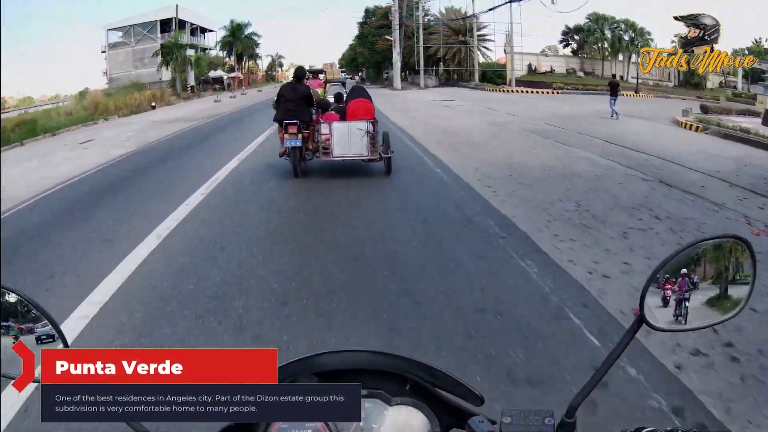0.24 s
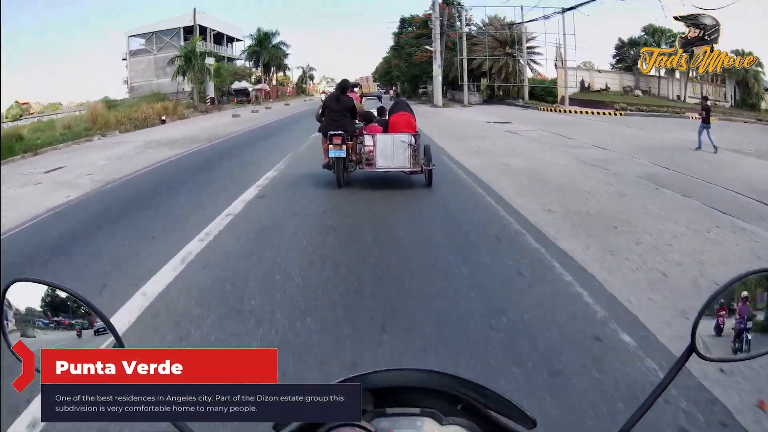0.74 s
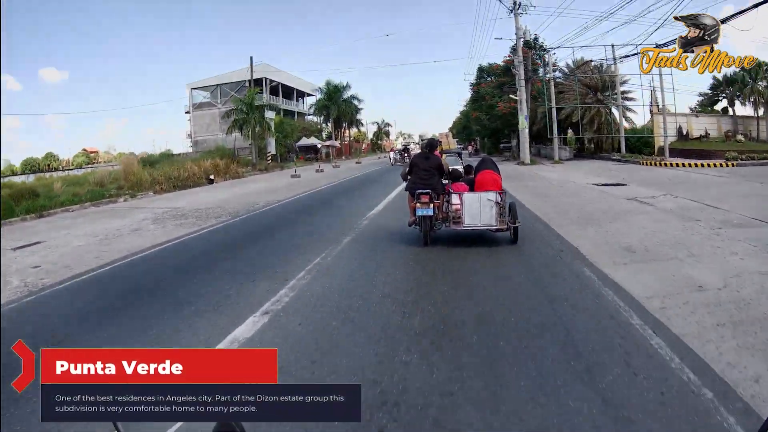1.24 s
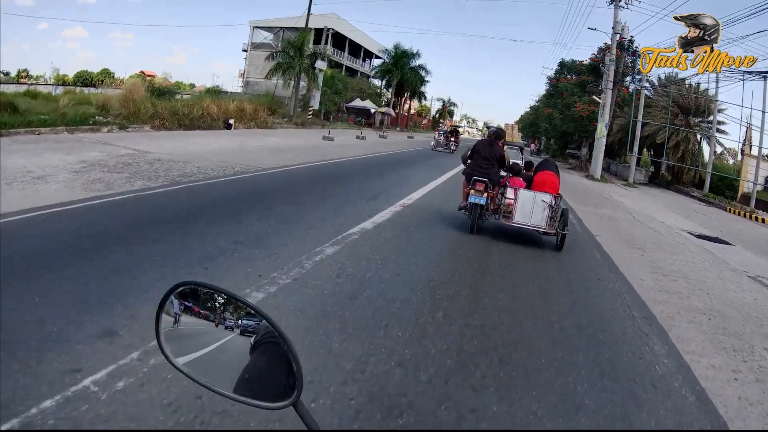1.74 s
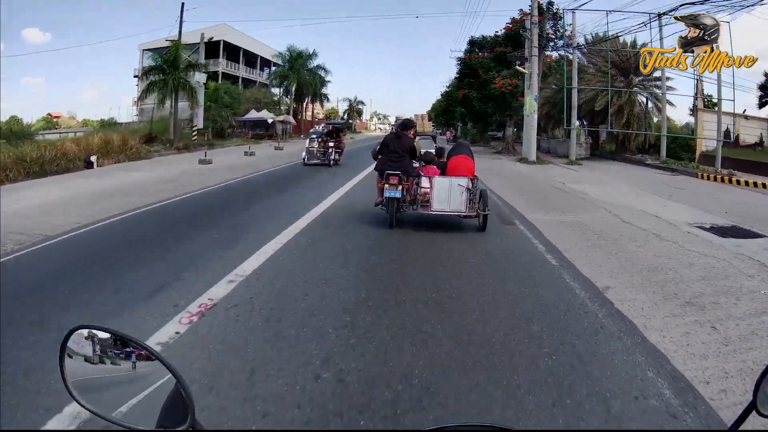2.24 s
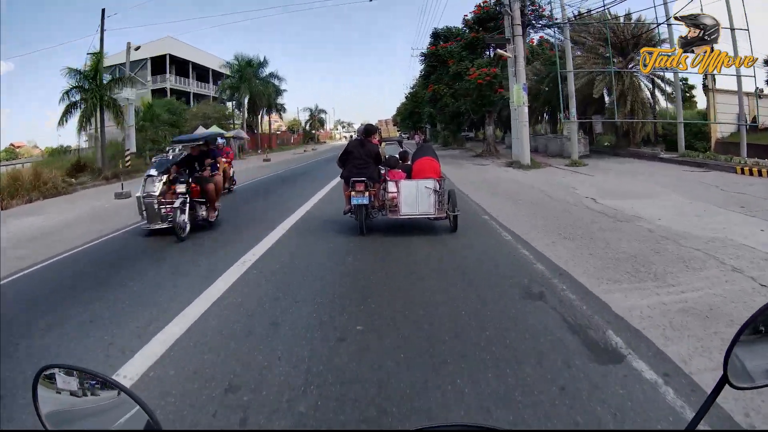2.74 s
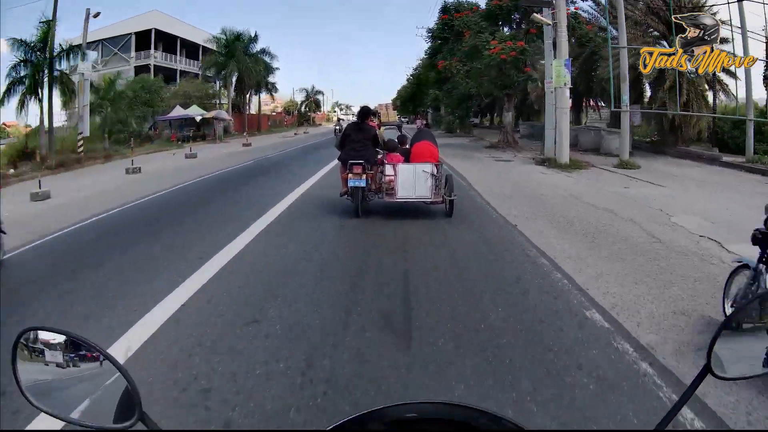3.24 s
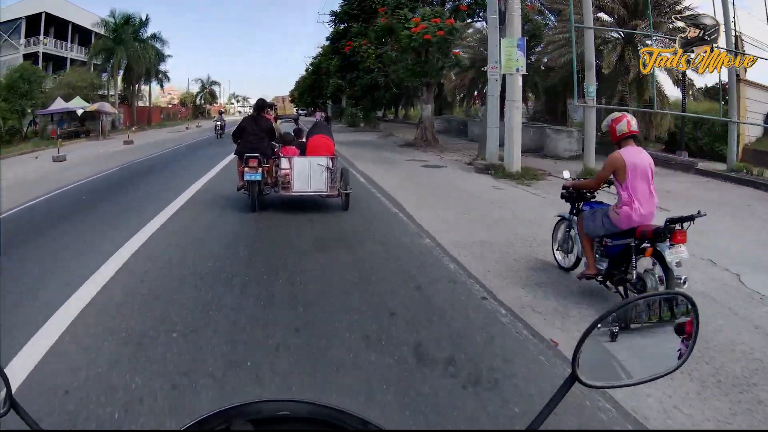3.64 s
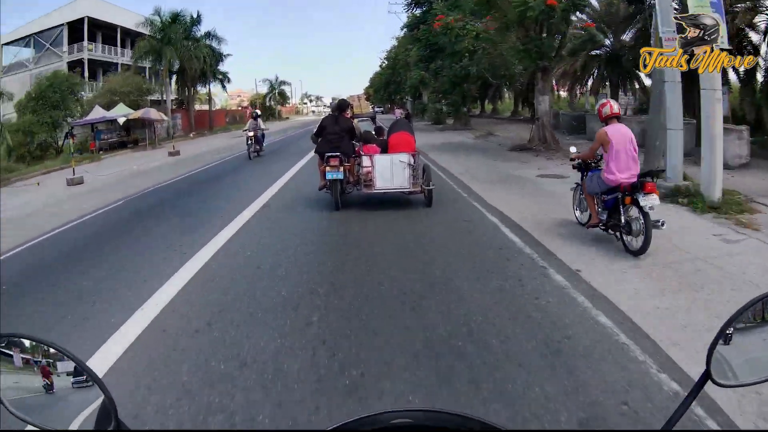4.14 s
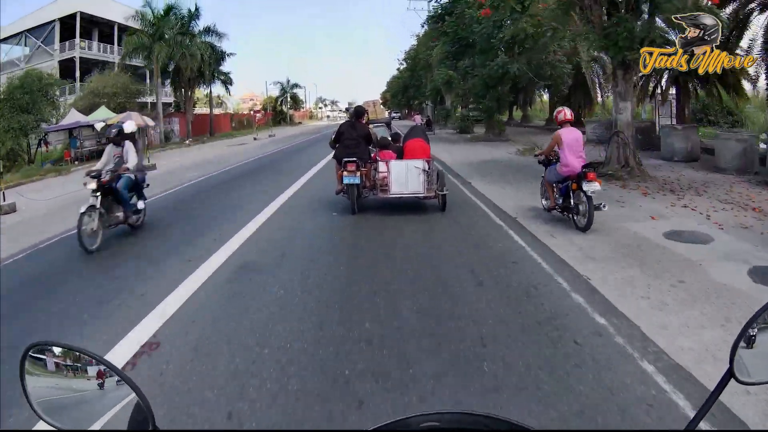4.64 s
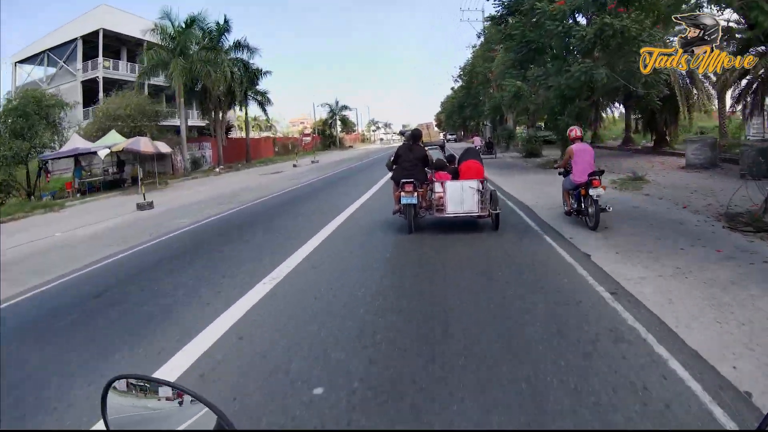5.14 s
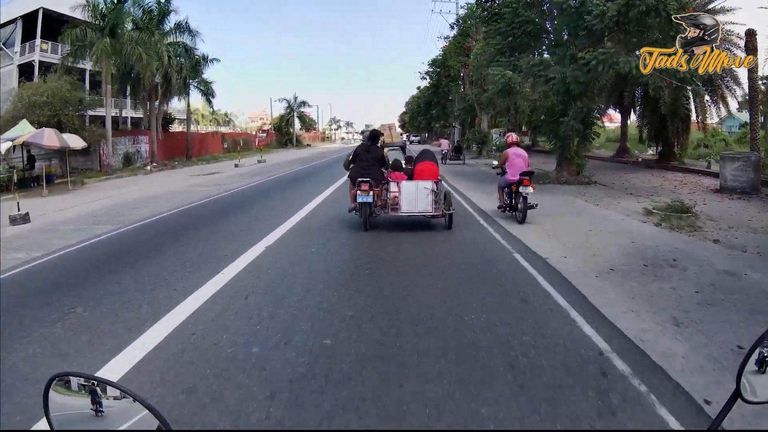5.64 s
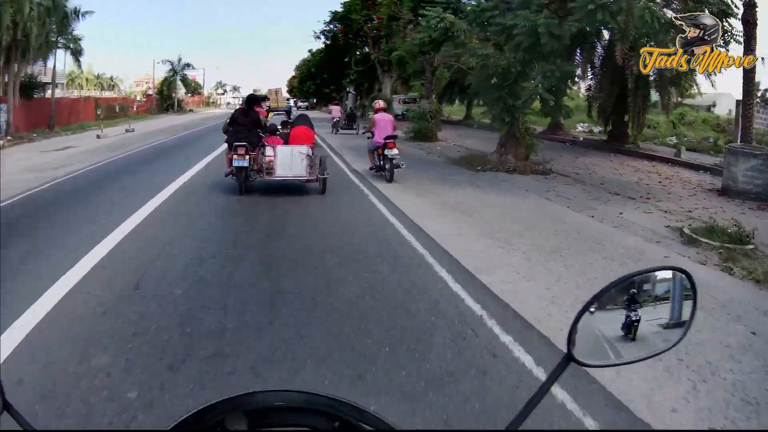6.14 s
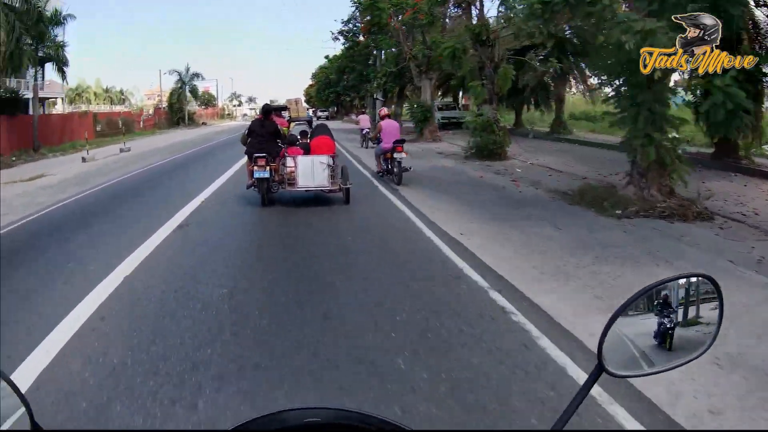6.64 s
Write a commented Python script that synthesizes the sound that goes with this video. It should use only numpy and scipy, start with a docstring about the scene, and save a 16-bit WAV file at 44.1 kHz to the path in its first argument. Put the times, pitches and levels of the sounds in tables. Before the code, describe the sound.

A continuous motorcycle ride, close and muffled at the rider's helmet. Deep, uneven wind rumble flutters throughout, with quick gusts near 0.1, 0.4, 0.8 and 1.1 seconds and a longer push around 1.8. Beneath it, a single-cylinder engine hums steadily at about 35 firings a second, with casing clatter, fine valve taps, tyre roar and thin air hiss. A sidecar motorcycle ahead drones low, swelling until 2.9 then dropping away. Near 2.8-3.0 a wavering gear whine slides down slightly as traffic brushes past; heavy exhaust thrum peaks around 3.3-3.5. A deeper, slower overtaking bike stays strong until about 4.3, then fades. Loud moments briefly squash the level. Wind thumps again at 5.2-5.4; a broad, soft passing swell comes near 6.5. Tiny metallic rattles tick irregularly, clustering around 4 seconds. The ride continues to the end at about 6.9.

```python
"""Wind buffets a muffled microphone at a motorcycle rider's helmet: noise in bands, swollen by gusts.
Below it lie tyre roar and air hiss, also noise, and the rider's single-cylinder engine: sines on its firing rate,
gated clatter and valve taps. Pulses ringing in pipes make a sidecar rig ahead, an overtaking bike and an oncoming
rig, whose gear whine is a gliding tone. Loose parts tick as decaying rings, passing traffic adds swells and sizzle,
and loud stretches pull the recorder's gain down."""
import sys
import numpy as np
from scipy import signal
from scipy.io import wavfile

SR = 44100
rng = np.random.default_rng(int(sys.argv[2]) if len(sys.argv) > 2 else 0)


def generate_wav(sig):
    """Save sig (samples, or channels by samples) to the path in sys.argv[1] as 16-bit PCM at SR."""
    pcm = np.round(np.clip(np.atleast_2d(sig).T, -1, 1) * 32767).astype(np.int16)
    wavfile.write(sys.argv[1], SR, pcm)


N = 304731


def from_db(db):
    """Decibel law: 20 dB is a factor of ten in amplitude."""
    return 10 ** (np.asarray(db) / 20)


def rms_one(x):
    """Normalisation of the effective value to 1."""
    return x / np.sqrt(np.mean(x ** 2) + 1e-20)


def in_time(rows):
    """Linear interpolation of each column over time; the end values are held outside the rows."""
    s, *columns = np.transpose(rows)
    return [np.interp(np.arange(N) / SR, s, column) for column in columns]


def drift(rate):
    """Low-passed chance: a random curve of spread 1 that wanders about `rate` times a second."""
    r = np.exp(-80 * np.pi * rate / SR)   # one value every 40 samples
    white = rng.standard_normal(N // 40 + 2002)
    slow = signal.lfilter([1], [1, -2 * r, r * r], white)[2000:]   # the filter has settled
    return np.interp(np.arange(N) / 40, np.arange(len(slow)), rms_one(slow))


def resonance(x, hz, width_hz):
    """Damped resonator: a two-pole band-pass with gain 1 at its top."""
    r = np.exp(-np.pi * width_hz / SR)
    zeros = np.array([1, 0, -1]) * (1 - r * r) / 2
    poles = [1, -2 * r * np.cos(2 * np.pi * hz / SR), r * r]
    return signal.lfilter(zeros, poles, x)


def double_resonance(x, hz, width_hz):
    """Cascaded resonators: the second, twice as wide, steepens the skirts of the first."""
    return resonance(resonance(x, hz, width_hz), hz, 2 * width_hz)


def banded_noise(spectrum, together_db, own_db, flicker_rate, tilt_db=lambda hz: 0):
    """Subtractive synthesis: third-octave bands of noise flicker partly together, partly each alone."""
    hz, level_db = np.transpose(spectrum)
    edges = np.geomspace(hz[0], hz[-1], round(3 * np.log2(hz[-1] / hz[0])) + 1)
    white = rng.standard_normal((2, N))   # neighbouring bands take turns
    together = drift(flicker_rate)
    plain, out = 0, 0
    for k, (low, high) in enumerate(zip(edges, edges[1:])):
        centre = np.sqrt(low * high)
        band_pass = signal.butter(2, [low, high], "band", fs=SR, output="sos")
        band = signal.sosfilt(band_pass, white[k % 2])
        band = band * from_db(np.interp(np.log(centre), np.log(hz), level_db))
        plain = plain + band
        flicker_db = together_db * together + own_db * drift(flicker_rate)
        out = out + band * from_db(flicker_db + tilt_db(centre))
    return out / np.std(plain)   # unit level before flicker and tilt


DOPPLER_SHARE = 0.018   # largest pitch shift, up on approach and down on departure


def going_by(closest_s, half_s, steepness=1, slide=DOPPLER_SHARE):
    """Spreading loss and Doppler shift on a straight pass: loss in dB and pitch factor."""
    along = (np.arange(N) / SR - closest_s) / half_s
    loss_db = -10 * steepness * np.log10(1 + along ** 2)
    pitch = 1 - slide * along / np.sqrt(1 + along ** 2)
    return loss_db, pitch


# Steady wind on the microphone. Each row: time in seconds, level before the tilts and gusts in dB,
# extra on the deepest part in dB, extra on the fluttering upper part in dB.
WIND_FLOW = [(0, -24.5, -2, 2.5), (.95, -33.5, 3, 3.5), (1.05, -33, 3, 2), (1.15, -25.5, 8, -1),
             (2.3, -23, 6.5, 0), (2.9, -27, 3.5, 7.5), (3.3, -21, -2.5, -6.5), (3.6, -21.5, 0, -3),
             (3.9, -28, -4, -5), (4.2, -27.5, -10, -6), (4.7, -28, -3, 1), (5.3, -26, -12, -2.5),
             (5.6, -30, -1, 0.5), (6.5, -26.5, -6, 1), (6.91, -24, 4, -0.5)]
# Gusts of wind. Each row: strongest moment in seconds, length in seconds, rise in dB, centre in Hz,
# reach above the centre in octaves.
WIND_GUSTS = [(0.108, 0.2, 7.5, 95, 1), (.41, .1, 9.5, 220, 2.8), (.8, .14, 9, 76, 1.1),
              (1.12, .2, 13, 130, 0.78), (1.55, .14, 3.5, 100, 2), (1.83, .3, 14, 112, 1.8),
              (2.18, .1, 9, 40, 1.3), (2.42, .14, 8, 140, 1.3), (2.63, .1, 13.5, 113, 0.67),
              (3.136, .25, 12, 185, 1.1), (3.335, .08, 13.5, 95, 1), (3.5, .1, 10, 60, 1.2),
              (3.725, .14, 7.5, 88, 2.3), (3.957, .08, 7.5, 252, 1.6), (4.3, .14, 9.5, 79, 1.1),
              (5.17, .12, 7, 90, 1.2), (5.38, .12, 18, 87, 0.7), (5.85, .1, 0, 90, .9),
              (6.35, .1, 0.5, 80, 1.6), (6.724, 0.087, 4.5, 120, 1.5), (6.87, .08, 9.5, 80, 1.25)]
# Average spectrum of the wind noise. Each row: frequency in Hz, relative density in dB per Hz.
WIND_SPECTRUM = [(12, -52), (20, -26.5), (65, -5.5), (122, 0.5), (233, -8.5), (265, -9.5), (439, -26),
                 (857, -31), (1270, -55.5), (1500, -37.5), (1950, -63.5), (3300, -120)]
GUST_ATTACK_SHARE, GUST_REACH_BELOW_OCTAVES = 0.38, 0.95


def wind():
    """Turbulence: eddies make lumpy noise; gusts swell about their own pitch and die more slowly."""
    level_db, deep_db, upper_db = in_time(WIND_FLOW)
    s, length, rise_db, centre_hz, reach = np.transpose(WIND_GUSTS)[:, :, None]
    coarse = np.arange(0, N, 64) / SR
    share = np.where(coarse < s, GUST_ATTACK_SHARE, 1 - GUST_ATTACK_SHARE)
    swell_db = rise_db * np.exp(-((coarse - s) / (share * length)) ** 2)

    def tilt_db(hz):
        """Spectral weighting: bell-shaped gusts, and shelves below 80 Hz and above 150 Hz."""
        octaves = np.log2(hz / centre_hz)
        near = np.exp(-(octaves / np.where(hz > centre_hz, reach, GUST_REACH_BELOW_OCTAVES)) ** 2 / 2)
        gusts_db = np.interp(np.arange(N) / SR, coarse, np.sum(near * swell_db, axis=0))
        deep_share = np.clip(np.log2(80 / hz), 0, 1)
        upper_share = np.clip(np.log2(hz / 150), 0, 1)
        return gusts_db + deep_share * deep_db + upper_share * upper_db

    noise = banded_noise(WIND_SPECTRUM, together_db=1.5, own_db=1.95, flicker_rate=14.9, tilt_db=tilt_db)
    return from_db(level_db) * noise


# Tyres and air at a steady pace. Each row: time in seconds, roar before its tilt in dB, hiss in dB,
# brightness of the roar before the swells in dB per octave.
STEADY_ROAD = [(0, -44, -63.5, -1.5), (.8, -45, -66.5, -3), (1.3, -46.5, -70.5, -2.5),
               (2, -45.5, -71, -5.5), (2.5, -47.5, -76, -0.5), (3.6, -44.5, -65.5, -1.8),
               (4.4, -44.5, -66.5, -0.8), (5.5, -42.5, -68, -0.2), (6.91, -42.5, -65.5, -0.1)]
# Swells as traffic and roadside go by. Each row: closest moment in seconds, half length in seconds,
# roar before its tilt in dB, hiss in dB, upper sizzle in Hz and in dB, lower sizzle in Hz and in dB,
# share by which the upper sizzle starts high and ends low.
PASSING_SWELLS = [(2.299, .16, -45, -70.5, 3650, -63, 2663, -59.5, .01),
                  (2.82, .22, -38.5, -63, 5950, -63.5, 3687, -60.5, .1),
                  (3.24, 0.13, -46, -60.5, 5310, -65.5, 3460, -63, 0.028),
                  (3.847, .15, -44, -76, 7730, -73.5, 1350, -59, .02),
                  (4.982, .1, -46.5, -66, 5380, -65.5, 2146, -62, 0.028),
                  (6.546, .35, -51, -71, 5670, -69.5, 2503, -61.5, 0.0015)]
# Spectrum of the tyre roar. Each row: frequency in Hz, relative density in dB per Hz.
ROAR_SPECTRUM = [(240, -23), (400, -7), (591, -8.5), (865, -9), (1130, -17), (1610, -14.5), (3080, -30),
                 (3490, -23), (5000, -45), (6500, -79.5), (11000, -120)]
# Spectrum of the hiss of air and grit. Each row: frequency in Hz, relative density in dB per Hz.
HISS_SPECTRUM = [(2350, -32), (4000, 3.5), (4720, -4.5), (5420, -6), (7070, 3), (9150, -9), (12000, -27),
                 (15600, -46), (22000, -120)]
SWELL_TILT_SHARE = 0.33   # dB per octave gained for each dB of swell


def road():
    """Incoherent addition: every swell adds its power to tyre roar and hiss, and brightens the roar."""
    roar_db, hiss_db, bright_db = in_time(STEADY_ROAD)
    roar_power, hiss_power = from_db(2 * roar_db), from_db(2 * hiss_db)
    for s, half_s, near_roar_db, near_hiss_db, *_ in PASSING_SWELLS:
        loss_db = going_by(s, half_s, steepness=0.78)[0]
        roar_power = roar_power + from_db(2 * (near_roar_db + loss_db))
        hiss_power = hiss_power + from_db(2 * (near_hiss_db + loss_db))
    bright_db = bright_db + SWELL_TILT_SHARE * (10 * np.log10(roar_power) - roar_db)
    roar = banded_noise(ROAR_SPECTRUM, together_db=-0.05, own_db=1.2, flicker_rate=6.5,
                        tilt_db=lambda hz: bright_db * np.log2(hz / 1500))
    hiss = banded_noise(HISS_SPECTRUM, together_db=.8, own_db=1.1, flicker_rate=10)
    return np.sqrt(roar_power) * roar + np.sqrt(hiss_power) * hiss


# Pace of the rider's own engine. Each row: time in seconds, firings per second, load in dB.
ENGINE_PACE = [(0, 34.5, 2), (.6, 35.4, 2), (1.2, 36.1, 2), (2.1, 36.7, 1), (3.8, 37.2, 0), (4.5, 35.7, -5),
               (5.2, 34.7, -3), (6.1, 36.1, 1.5), (6.91, 36.6, 1.5)]
# Its hum. Each row: multiple of the firing rate, rms level before the load in dB.
ENGINE_HUM = [(2, -43), (5, -46), (7, -48), (10, -47), (11, -46), (12, -49), (13, -52), (14, -52),
              (15, -57), (18, -55), (22, -59), (24, -55), (29, -67)]
# Covers and panels, shaken once a crank turn. Each row: resonance in Hz, width in Hz,
# rms level before the load in dB.
CASING_MODES = [(887, 100, -57.5), (1392, 50, -70.5), (1552, 46, -67.5), (2070, 32, -71), (2210, 59, -87.5),
                (2497, 130, -69.5), (5230, 290, -82.5), (7700, 300, -86)]
# Valve gear tapping on the cylinder head. Each row: time in seconds, rms level in dB.
VALVE_LEVEL = [(0, -66), (.2, -62), (1, -68), (1.9, -77.5), (3.5, -62), (4.5, -72), (5.8, -74.5),
               (6.28, -62.5), (6.55, -70), (6.91, -61)]
HEAD_HZ, HEAD_WIDTH_HZ = 3420, 100
ENGINE_TOP_HZ = 8000   # the engine is cut off above this


def engine_hum(cycle):
    """Fourier synthesis: steady multiples of the firing rate, each with a wavering level."""
    return sum(np.sqrt(2) * from_db(level_db + 2 * drift(3.1))
               * np.sin(order * cycle + 2 * np.pi * rng.random())
               for order, level_db in ENGINE_HUM)


def engine_clatter(cycle):
    """Forced vibration: noise gated by the crank rings the modes of the casing."""
    # two crank turns a firing, the firing turn the louder
    gate = np.exp(0.39 * np.cos(2 * cycle) + 0.3 * np.cos(cycle))
    clatter = gate * rng.standard_normal(N)
    return sum(from_db(level_db + 1.0 * drift(3.9)) * rms_one(resonance(clatter, hz, width_hz))
               for hz, width_hz, level_db in CASING_MODES)


def valve_taps(turns):
    """Impulse response: valves seating on the cylinder head strike its resonance."""
    # one valve seats hard, the other more softly half a cycle later
    taps = sum(strength * (np.diff(np.floor(turns + late), prepend=0) > 0)
               for late, strength in ((0, 1), (.5, 0.6)))
    uneven_taps = taps * from_db(3 * rng.standard_normal(N))
    strikes = uneven_taps + .045 * rng.standard_normal(N)   # faint steady noise between the taps
    head = rms_one(double_resonance(strikes, HEAD_HZ, HEAD_WIDTH_HZ))
    return from_db(in_time(VALVE_LEVEL)[0]) * head


def own_engine():
    """Superposition: hum and clatter follow the load, valve taps keep their own level."""
    per_s, load_db = in_time(ENGINE_PACE)
    turns = np.cumsum(per_s * (1 + .001 * drift(3))) / SR   # counted in firings
    cycle = 2 * np.pi * turns
    engine = from_db(load_db) * (engine_hum(cycle) + engine_clatter(cycle)) + valve_taps(turns)
    return signal.sosfilt(signal.butter(4, ENGINE_TOP_HZ, fs=SR, output="sos"), engine)


def exhaust(per_s, level_db, pipe, uneven_db):
    """Pulse excitation: one pressure pulse a firing, each of its own strength, rings in the pipe."""
    cycle = np.cumsum(per_s * (1 + 0.0045 * drift(5.5))) / SR
    firings = np.diff(np.floor(cycle), prepend=0) > 0
    pulses = firings * from_db(uneven_db * rng.standard_normal(N)) + 1e-18
    tone = sum(from_db(gain_db) * rms_one(double_resonance(pulses, hz, width_hz))
               for hz, width_hz, gain_db in pipe)
    return from_db(level_db) * tone


# Pace of the sidecar rig ahead. Each row: time in seconds, firings per second.
SIDECAR_PACE = [(0, 42), (.6, 41.2), (2.5, 37.7), (3.4, 37.4)]
# Its exhaust. Each row: time in seconds, level in dB.
SIDECAR_LOUDNESS = [(0, -33.5), (1.5, -31.5), (2.9, -25), (3.4, -51)]
# Its exhaust pipe. Each row: resonance in Hz, width in Hz, relative level in dB.
SIDECAR_RESONANCES = [(200, 60, 0), (370, 60, -15)]


def sidecar_ahead():
    """Pipe resonance: the drone of the rig ahead swells, then falls away."""
    return exhaust(*in_time(SIDECAR_PACE), *in_time(SIDECAR_LOUDNESS), SIDECAR_RESONANCES, uneven_db=3.0)


# Pace of the overtaking bike. Each row: time in seconds, firings per second.
OVERTAKER_PACE = [(2.4, 29.6), (3.3, 30), (4.3, 30.2), (4.8, 29.4), (5.6, 30.8), (6.91, 31.3)]
# Its exhaust. Each row: time in seconds, level in dB.
OVERTAKER_LOUDNESS = [(2.4, -37), (2.8, -34), (3.3, -18), (3.7, -22), (4.28, -18.5), (4.42, -25),
                      (5.2, -28), (6.91, -34)]
# Its exhaust pipe. Each row: resonance in Hz, width in Hz, relative level in dB.
OVERTAKER_RESONANCES = [(130, 34, 0), (285, 45, -18)]


def overtaking_bike():
    """Pipe resonance: slower, deeper pulses, faint at first, grow loud and fade as the bike overtakes."""
    return exhaust(*in_time(OVERTAKER_PACE), *in_time(OVERTAKER_LOUDNESS), OVERTAKER_RESONANCES,
                   uneven_db=2.1)


# Loose parts. Each row: start in seconds, level in dB, pitch in Hz.
LOOSE_PART_TICKS = [(0.213, -41.5, 3320), (2.264, -46, 3650), (2.313, -43, 3760), (2.338, -44, 3680),
                    (2.683, -39, 3410), (3.105, -47, 4400), (3.241, -51, 5670), (3.885, -39, 3420),
                    (3.95, -48, 4770), (4.007, -47, 4630), (4.109, -46, 4500), (4.16, -47, 4370),
                    (4.24, -48, 3510), (4.48, -39, 4340), (5.149, -44, 4400), (6.063, -37.5, 3430),
                    (6.669, -44.5, 4170), (6.845, -40, 3350)]
# more of them at random moments
FAINT_TICKS, FAINT_TICK_DB, FAINT_TICK_SPREAD_DB = 45, -56, 3
FAINT_TICK_LOW_HZ, FAINT_TICK_HIGH_HZ = 3300, 9500


def ticks():
    """Free vibration: each tick is a short metallic ring with a dry crack on its front."""
    out, t = np.zeros(N + SR), np.arange(SR // 20) / SR
    pitch_range = FAINT_TICK_HIGH_HZ / FAINT_TICK_LOW_HZ
    faint = [(when * N / SR,
              FAINT_TICK_DB + FAINT_TICK_SPREAD_DB * (2 * size - 1),
              FAINT_TICK_LOW_HZ * pitch_range ** pitch)
             for when, size, pitch in rng.random((FAINT_TICKS, 3))]
    for s, level_db, hz in LOOSE_PART_TICKS + faint:
        at = round(s * SR)
        ring_decay = from_db(-60 * t / .02)   # 60 dB in 20 ms
        ring = ring_decay * (1 - np.exp(-t / .0004)) * np.sin(2 * np.pi * hz * t)
        burst = resonance(resonance(rng.standard_normal(len(t)), hz, 4000), hz, 2000)
        crack = .5 * from_db(-60 * t / .008) * burst
        out[at:at + len(t)] += from_db(level_db) * (ring + crack)
    return out[:N]


SIZZLE_STEEPNESS = 1.3   # exponent of the fall in amplitude with distance


def swell_sizzle(width_hz=330):
    """Quadrature modulation: low-passed noise on gliding tones gives each swell two sliding bands."""
    upper_pair, lower_pair = [
        signal.sosfilt(signal.butter(2, hz, fs=SR, output="sos"), rng.standard_normal((2, N)))
        for hz in (width_hz, width_hz / 5)]
    out = 0
    for s, half_s, _, _, upper_hz, upper_db, lower_hz, lower_db, slide in PASSING_SWELLS:
        loss_db, pitch = going_by(s, half_s, SIZZLE_STEEPNESS)
        upper_hz = upper_hz * going_by(s, half_s, slide=slide)[1]
        bands = ((upper_hz, upper_db, upper_pair), (lower_hz * pitch, lower_db, lower_pair))
        for hz, level_db, pair in bands:
            cycle = 2 * np.pi * np.cumsum(hz) / SR
            band = rms_one(pair[0] * np.cos(cycle) + pair[1] * np.sin(cycle))
            out = out + from_db(level_db + loss_db) * band
    return from_db(2.1 * drift(13)) * out


WHINE_HZ, WHINE_TURN_S, WHINE_TURN_HALF_S = 1495, 3.02, .08   # pitch at the middle of its drop
WHINE_LOUDEST_S, WHINE_HALF_S, WHINE_DB, WHINE_STEEPNESS = 2.89, .15, -46, 3.4


def gear_whine():
    """Frequency modulation: the oncoming rig's gears make a wavering tone that drops in pitch."""
    hz = WHINE_HZ * going_by(WHINE_TURN_S, WHINE_TURN_HALF_S)[1]
    level_db = WHINE_DB + going_by(WHINE_LOUDEST_S, WHINE_HALF_S, WHINE_STEEPNESS)[0]
    cycle = 2 * np.pi * np.cumsum(hz * (1 + .008 * drift(40))) / SR
    return np.sqrt(2) * from_db(level_db + 1.8 * drift(25)) * np.sin(cycle)


# Exhaust pipe of the oncoming rig. Each row: resonance in Hz, width in Hz, relative level in dB.
RIG_RESONANCES = [(107, 23, 0.5), (360, 220, -13.5)]
RIG_FIRINGS_PER_S = 40.2   # before the Doppler shift
RIG_CLOSEST_S, RIG_HALF_S, RIG_DB, RIG_STEEPNESS = 3.5, 0.22, -22.5, 6.5


def oncoming_rig():
    """Doppler effect: the exhaust pulses come faster on approach and slower on departure."""
    loss_db, pitch = going_by(RIG_CLOSEST_S, RIG_HALF_S, RIG_STEEPNESS)
    return exhaust(RIG_FIRINGS_PER_S * pitch, RIG_DB + loss_db, RIG_RESONANCES, uneven_db=0.5)


def scene():
    """Superposition: the pressures of all sources add at the microphone, in one channel."""
    ride = wind() + road() + own_engine()
    traffic = sidecar_ahead() + overtaking_bike() + swell_sizzle() + gear_whine() + oncoming_rig()
    return (ride + ticks() + traffic)[None]


GAIN_THRESHOLD_DB, GAIN_SENSE_S = -19, 0.012
GAIN_SQUEEZE = 0.39   # dB of cut for each dB above the threshold
HELD_LEVEL_FALL_DB_PER_S = 27.5


def gain_control(x):
    """Dynamic compression: loud stretches pull the gain down quickly; it climbs back at a steady rate."""
    r = np.exp(-1 / (GAIN_SENSE_S * SR))
    level_db = 10 * np.log10(signal.lfilter([1 - r], [1, -r], x ** 2) + 1e-12)
    # a running peak on a rising ramp becomes a peak that falls steadily
    ramp_db = HELD_LEVEL_FALL_DB_PER_S * np.arange(N) / SR
    held_db = np.maximum.accumulate(level_db + ramp_db, axis=-1) - ramp_db
    cut_db = GAIN_SQUEEZE * np.maximum(held_db - GAIN_THRESHOLD_DB, 0)
    return x * from_db(-signal.lfilter([1 - r], [1, -r], cut_db))


# The shell around the microphone lifts or cuts bands. Each row: centre in Hz, width in Hz, gain in dB.
SHELL_BANDS = [(1220, 81, 0), (1790, 710, -4.5), (2520, 160, 1), (3120, 570, -4), (3930, 400, -1),
               (4570, 730, -6.5), (6530, 2800, -7.5), (8300, 680, -4), (9330, 450, 5)]
PREAMP_NOISE_DB = -77   # level of the white noise before it is differenced
CUTOFF_HZ = 15750


def record(dry):
    """Transmission chain: shell colour, preamplifier hiss, gain control, rounded peaks, steep low-pass."""
    for hz, width_hz, gain_db in SHELL_BANDS:
        dry = dry + (from_db(gain_db) - 1) * resonance(dry, hz, width_hz)
    hiss = from_db(PREAMP_NOISE_DB) * np.diff(rng.standard_normal(N + 1))   # differencing thins it
    levelled = gain_control(dry + hiss)
    rounded = .8 * np.tanh(levelled / .8)
    return signal.sosfilt(signal.ellip(12, .5, 70, CUTOFF_HZ, fs=SR, output="sos"), rounded)


dry = scene()
out = record(dry)
generate_wav(out)
```